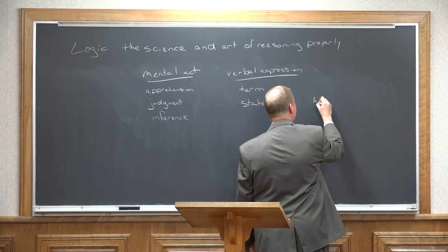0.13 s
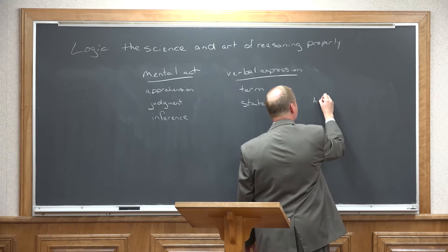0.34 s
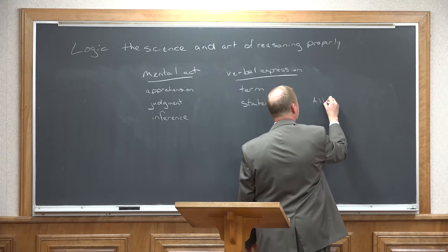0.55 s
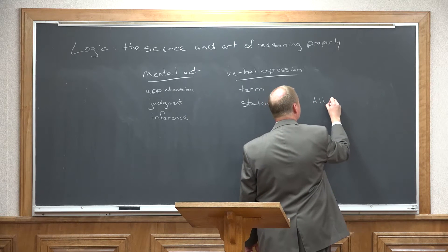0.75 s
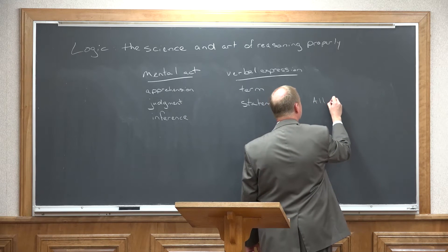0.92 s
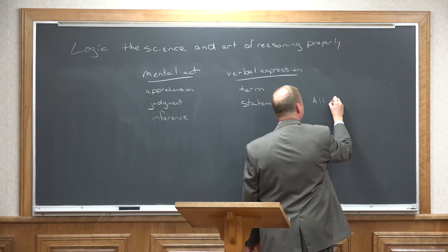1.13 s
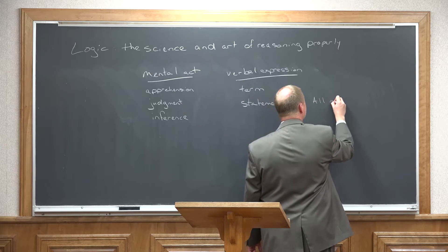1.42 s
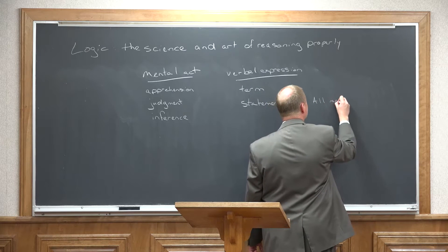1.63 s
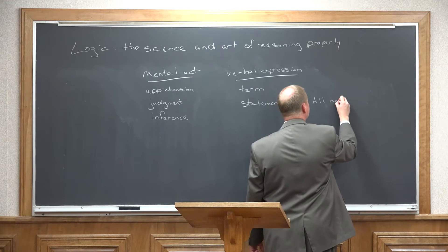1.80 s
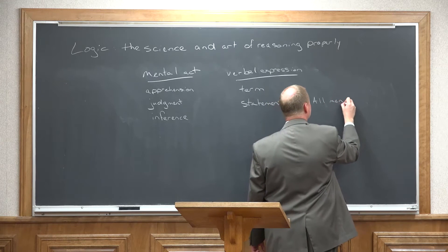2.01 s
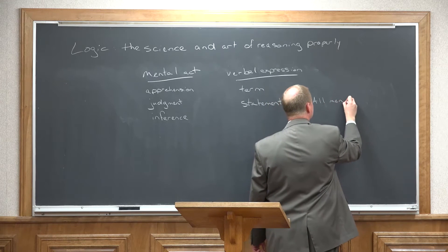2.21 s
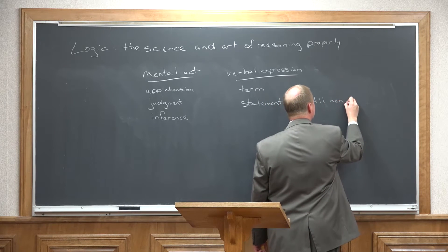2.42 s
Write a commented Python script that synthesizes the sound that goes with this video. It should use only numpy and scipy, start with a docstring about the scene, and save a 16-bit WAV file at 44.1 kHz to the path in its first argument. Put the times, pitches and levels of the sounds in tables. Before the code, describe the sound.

Chalk tapping and lightly scraping on a blackboard over a low ventilation rumble.

```python
"""Chalk on a framed blackboard in a quiet classroom, a few metres away. Ventilation rumbles throughout.
A stroke opens with a hard tap: a click and a crumbling tip, bending waves back from the frame,
the panel's thud and ring, then the room's tail. The chalk then drags, shedding grains in a faint hiss,
with an occasional small tick as it touches or leaves the board."""
import sys
import numpy as np
from scipy import signal
from scipy.fft import rfft, irfft
from scipy.io import wavfile
from scipy.ndimage import uniform_filter1d

SR = 44100
rng = np.random.default_rng(int(sys.argv[2]) if len(sys.argv) > 2 else 0)


def pcm_store(signal):
    """Save signal as 16-bit PCM."""
    levels = np.round(np.clip(np.atleast_2d(signal), -1, 1) * 32767)
    wavfile.write(sys.argv[1], SR, levels.astype(np.int16).T)


N = 112454

# (time [s], level [dB], treble [dB], clack [dB], bass [dB], ring [dB], room [dB], crumble [dB],
#  low modes [dB])
TAP_EVENTS = [(-.17, 2, 0, 0, 0, 2.5, 0, 0, -1), (0.1072, -1.5, -5.5, 1, 2, -2.5, -1, -12, -7.5),
              (0.3691, 3, 3.5, 1.5, 0.5, -2, -0.5, -2, -6.5),
              (0.7356, -2.5, -2, 0, -0.5, 1, 0.5, -5.5, -4.5),
              (1.3421, -1.5, -1.5, -1, 1.5, 1, 1, -4, -1.5), (1.6998, -1.5, 2.5, 3, 1, 0, 1, 7.5, 0.5),
              (2.1456, -0.5, -4.5, -3, -1.5, 0.5, 1.5, -6, 2.5)]
# (start [s], length [s], level [dB])
DRAG_EVENTS = [(.125, .075, 0), (.22, .08, -15), (0.812, 0.13, -4), (.94, 0.076, -3), (1.086, .035, 1.5),
               (1.173, 0.028, 3.5), (1.216, 0.018, 8), (1.355, .085, -2), (1.475, 0.048, 6),
               (1.533, 0.065, 1.5), (1.62, 0.11, -11.5), (1.78, 0.096, -2), (1.879, .05, 7.5),
               (1.937, 0.064, 3), (2.016, 0.126, -11), (2.148, 0.081, -1), (2.246, 0.073, 4.5),
               (2.327, .07, 3), (2.41, 0.086, -2), (2.502, .08, 5)]
# (time [s], level [dB])
TICK_EVENTS = [(.315, -36), (1.232, -31), (1.58, -32.5), (2.451, -34.5)]
# (frequency [Hz], level [dB], T60 [s])
PANEL_MODES = [(64.5, -41.5, 0.94), (87.1, -41.5, 0.44), (126.5, -42, 0.24), (216.1, -38.5, 0.55),
               (293.5, -40.5, 0.43), (326.5, -34.5, 0.19), (459, -43, 0.29), (569, -32.5, .1),
               (673, -33.5, 0.049), (776, -38, 0.12), (1073, -32.5, 0.085), (1123, -35.5, 0.098),
               (1491, -32.5, 0.097), (1783, -30, 0.041), (2730, -46, 0.07), (3674, -31, 0.03),
               (4150, -31, 0.022), (5310, -48, .04), (6050, -45.5, 0.029)]
# spectra (frequency [Hz], level [dB])
VENTILATION_SPECTRUM = [(20, -33), (38, -31), (66, -27), (110, -36), (200, -41.5), (400, -46),
                        (1000, -50.5), (2000, -56.5), (4000, -57.5), (8000, -62), (16000, -65)]
CLICK_SPECTRUM = [(40, 11), (250, -1), (480, 15.5), (750, 17.5), (1200, 7.5), (1650, 10.5), (2100, 4.5),
                  (2500, -4.5), (3100, 4.5), (4300, 2), (5600, -10), (9000, -13), (15000, -27)]
CRUMBLE_SPECTRUM = [(1000, 2), (3000, -6), (6000, -5.5), (10000, -15), (15000, -33)]
WAVE_SPECTRUM = [(40, 12), (110, 13), (200, 11.5), (420, 12), (650, 8.5), (900, 10.5), (1100, 11.5),
                 (1600, 10), (1950, 11), (2300, 4), (2900, -1), (3600, 1), (5200, -9.5), (8000, -13),
                 (15000, -22.5)]
ROOM_SPECTRUM = [(35, 18), (80, 16.5), (160, 15.5), (400, 10), (700, 10.5), (1100, 7.5), (1650, 8),
                 (2200, 0), (4000, -7.5), (6000, -16), (10000, -23), (15000, -36)]
DRAG_SPECTRUM = [(300, -31), (1500, 6), (2600, -3.5), (4000, -1.5), (5500, -6.5), (8000, -2.5), (10000, -5),
                 (12000, -7.5), (16000, -11)]
# decays (frequency [Hz], T60 [s])
WAVE_DECAY = [(100, 0.13), (500, 0.074), (1500, .10), (3500, 0.069), (9000, 0.042)]
ROOM_DECAY = [(70, 1.4), (250, 0.9), (700, 0.98), (1800, 0.77), (4500, 0.6), (10000, 0.45)]

RING_S = 1.2
BASS_HZ, CLACK_HZ, TREBLE_HZ = 332, 3770, 8000


def undb(db):
    """Decibels to gain."""
    return 10 ** (np.asarray(db) / 20)


def decay(t, t60_s):
    """Exponential fall, 60 dB per T60."""
    return np.exp(-np.log(1000) * t / t60_s)


def along(points, hz):
    """Read (frequency [Hz], value) points on a log-frequency axis."""
    knots_hz, values = np.array(points, float).T
    return np.interp(np.log(hz + 1e-3), np.log(knots_hz), values)


def colour(x, spectrum, size=4096):
    """Minimum-phase filter with the given spectrum."""
    gain = undb(along(spectrum, np.fft.rfftfreq(size, 1 / SR)))
    cepstrum = irfft(np.log(gain))
    cepstrum[1:size // 2] *= 2
    cepstrum[size // 2 + 1:] = 0
    return signal.fftconvolve(x, irfft(np.exp(rfft(cepstrum))))[:len(x)]


def add(out, x, at_s):
    """Mix x into out; anything before time zero is cut."""
    start = int(round(at_s * SR))
    x, start = x[max(-start, 0):], max(start, 0)
    out[start:start + len(x)] += x[:max(len(out) - start, 0)]


def drift(rate_hz):
    """Smooth random drift, unit spread."""
    width = int(SR / rate_hz)
    smooth = uniform_filter1d(uniform_filter1d(rng.standard_normal(N), width), width)
    return smooth / smooth.std()


def reflections(decays, delay_s, rise_s):
    """Dense echoes, flat in total spectrum; each band dies at its own rate."""
    n = int(RING_S * SR)
    t = np.maximum(np.arange(n) / SR - delay_s, 0)
    hz = np.fft.rfftfreq(n, 1 / SR)
    noise, out = rfft(rng.standard_normal(n)), 0
    for band_hz, t60_s in decays:
        band = along([(f, float(f == band_hz)) for f, _ in decays], hz)
        envelope = (1 - np.exp(-t / rise_s)) * decay(t, t60_s)
        out = out + irfft(noise * band, n) * envelope / np.linalg.norm(envelope)
    return out


def ventilation():
    """Low rumble under a thin, even hiss."""
    gain = undb(along(VENTILATION_SPECTRUM, np.fft.rfftfreq(N, 1 / SR)))
    return irfft(rfft(rng.standard_normal(N)) * gain, N)


def click(t, dispersion_hz=5000):
    """Board pushed away: a low-pressure pulse. Stiffness sends treble ahead of bass."""
    pulse = colour(signal.unit_impulse(len(t)), CLICK_SPECTRUM)
    warped = np.tan(np.pi * dispersion_hz / SR)
    allpass = (warped - 1) / (warped + 1)
    return -signal.lfilter([allpass, 1], [1, allpass], pulse)


def crumble(t, rise_s=0.00018, t60_s=0.009):
    """The tip crushes in a short noise burst."""
    envelope = (1 - np.exp(-t / rise_s)) * decay(t, t60_s)
    burst = rng.standard_normal(len(t)) * envelope / np.linalg.norm(envelope)
    return colour(burst, CRUMBLE_SPECTRUM)


def panel(t, low_db, low_below_hz=450, rise_s=0.00095, gain_db=3):
    """Modes build as waves cross the board; the contact point sets how much the low ones ring."""
    ring = 0
    for hz, db, t60_s in PANEL_MODES:
        gain = undb(db + low_db * (hz < low_below_hz))
        phase = rng.uniform(0, 2 * np.pi)
        ring += gain * np.sin(2 * np.pi * hz * t + phase) * decay(t, t60_s)
    return undb(gain_db) * ring * (1 - np.exp(-(t / rise_s) ** 2))


def frame_waves():
    """Bending waves return from the frame."""
    return reflections(WAVE_DECAY, delay_s=0.00168, rise_s=0.00075)


def thud(t, arrival_s=0.00778, hz=139, width_s=0.0015, gain_db=-25.5):
    """The slow, low bending wave arrives last."""
    lag_s = t - arrival_s
    return undb(gain_db) * np.cos(2 * np.pi * hz * lag_s) * np.exp(-(lag_s / width_s) ** 2)


def room_tail():
    """Diffuse impulse response of the classroom."""
    return reflections(ROOM_DECAY, delay_s=0.012, rise_s=0.016)


def tap(common_waves, treble_db, clack_db, bass_db, ring_db, room_db, crumble_db, low_db):
    """Chalk strikes the board. Hard contact adds treble; the stick clacks."""
    t = np.arange(int(RING_S * SR)) / SR
    tip = undb(crumble_db) * crumble(t)
    share = 0.34  # wave power common to all taps
    waves = np.sqrt(share) * common_waves + np.sqrt(1 - share) * frame_waves()
    ring = undb(ring_db) * (colour(waves, WAVE_SPECTRUM) + panel(t, low_db))
    room = undb(room_db) * colour(room_tail(), ROOM_SPECTRUM)
    contact = [(BASS_HZ / 2, bass_db), (BASS_HZ * 2, 0),
               (CLACK_HZ / 2, 0), (CLACK_HZ, clack_db), (TREBLE_HZ, treble_db)]
    return colour(click(t) + thud(t) + ring + room, contact) + tip


def drags(attack_s=0.031, release_s=0.027, grains_per_s=8000, spread_db=2.8, pressure_db=1.6,
          gain_db=-56.5, room_db=-2.5):
    """Sliding chalk crumbles in dense, tiny grains under wavering pressure."""
    t = np.arange(N) / SR
    slide = 0
    for start_s, length_s, db in DRAG_EVENTS:
        attack = np.clip((t - start_s) / attack_s + 0.5, 0, 1)
        release = np.clip((start_s + length_s - t) / release_s + 0.5, 0, 1)
        slide += undb(db) * attack * release
    grains = (rng.random(N) < grains_per_s / SR) * rng.standard_normal(N)
    grains *= undb(spread_db * np.minimum(rng.exponential(size=N), 4))
    pressure = undb(pressure_db * drift(rate_hz=50))
    hiss = colour(grains / grains.std() * slide * pressure, DRAG_SPECTRUM)
    room = signal.fftconvolve(hiss, room_tail())[:N]
    return undb(gain_db) * (hiss + undb(room_db) * room)


def tick(common_waves):
    """Chalk touches or leaves the board: more crumble, little room."""
    return tap(common_waves, treble_db=-4, clack_db=-6, bass_db=7, ring_db=-4.5,
               room_db=-16, crumble_db=8, low_db=3)


def scene():
    """Ventilation, taps, drags and ticks; mono."""
    out = ventilation() + drags()
    common_waves = frame_waves()
    for at_s, db, *tone_db in TAP_EVENTS:
        add(out, undb(db) * tap(common_waves, *tone_db), at_s)
    for at_s, db in TICK_EVENTS:
        add(out, undb(db) * tick(common_waves), at_s)
    return out[None]


def record(dry):
    """Steep low-pass."""
    cutoff_hz = 15950
    lowpass = signal.firwin(255, cutoff_hz, fs=SR, window="blackman")
    return signal.fftconvolve(dry, lowpass[None], mode="same")


dry = scene()
out = record(dry)
pcm_store(out)
```